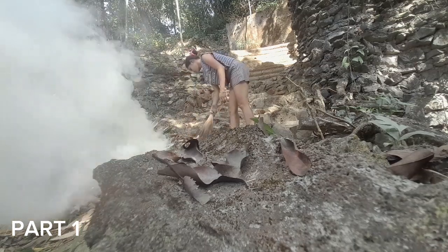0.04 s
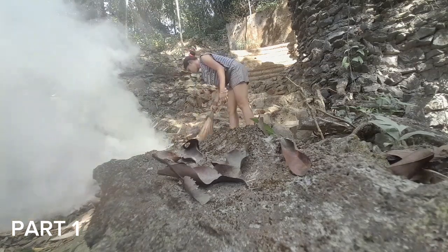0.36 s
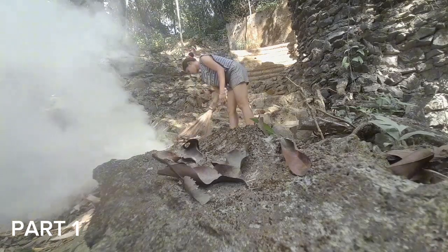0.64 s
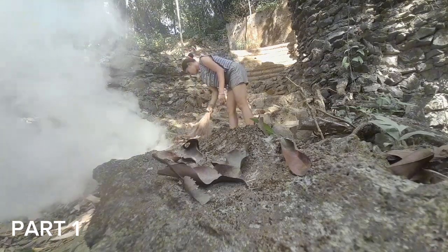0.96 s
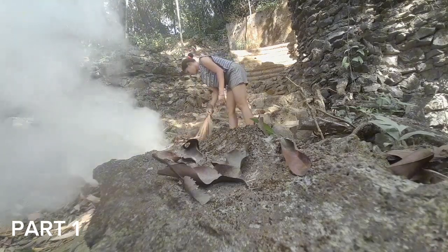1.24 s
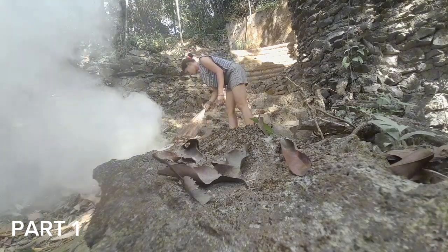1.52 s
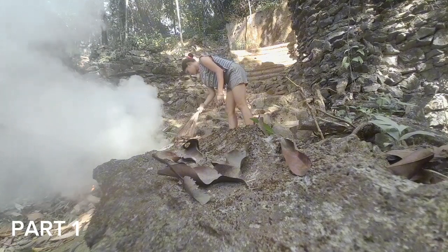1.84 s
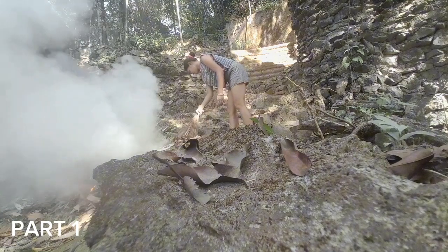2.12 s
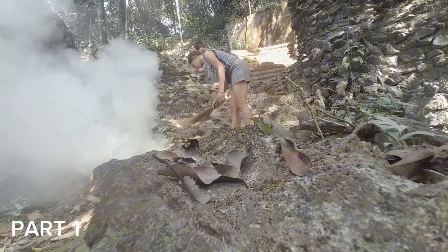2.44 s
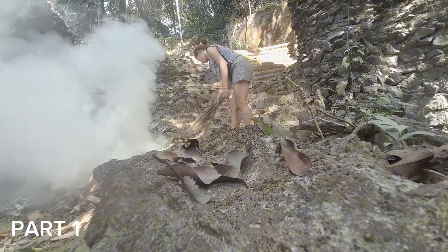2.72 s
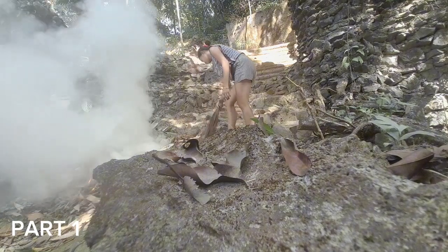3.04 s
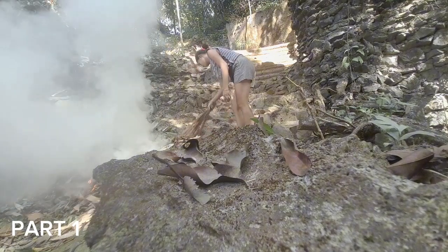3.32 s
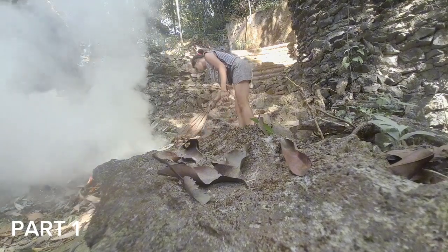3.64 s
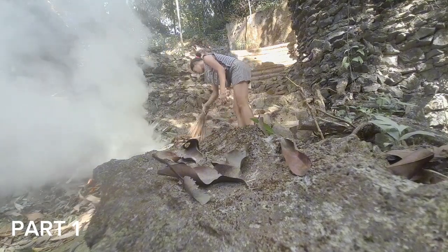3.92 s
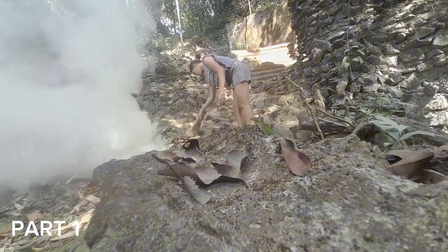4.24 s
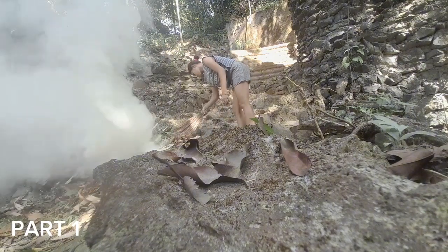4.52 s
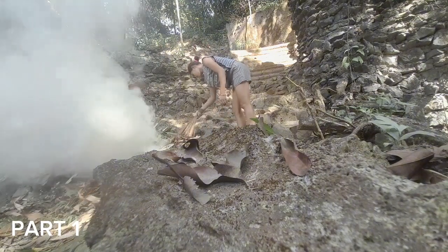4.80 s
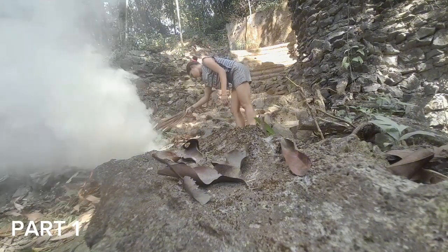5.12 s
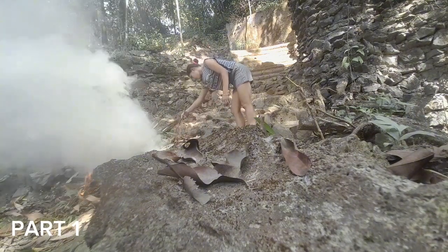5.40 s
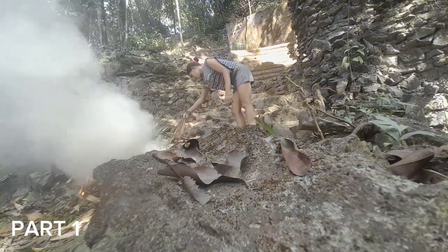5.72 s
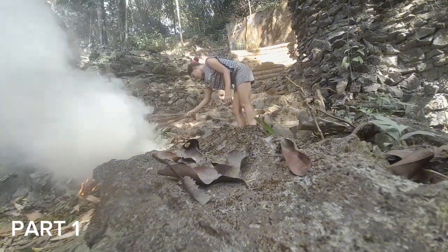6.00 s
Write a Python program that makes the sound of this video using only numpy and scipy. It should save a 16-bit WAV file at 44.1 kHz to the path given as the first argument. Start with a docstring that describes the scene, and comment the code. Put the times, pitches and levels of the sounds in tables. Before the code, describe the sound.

A stick broom sweeps dry leaves in scratchy strokes outdoors, while a small fire snaps now and then on the left.

```python
"""From the start, a stick broom sweeps dry leaves over rock a few metres away, about two strokes a second,
above a low forest rumble. Leaves crackle, and the broom's twigs rasp and knock on the ground.
After two seconds a small leaf fire on the left begins to snap now and then as fibres burst.
A distant bird gives one thin call just afterwards. The loudest snap comes a little past four seconds,
and the sweeping goes on to the end."""
import sys
import numpy as np
from scipy import signal
from scipy.fft import rfft, irfft
from scipy.io import wavfile
from scipy.ndimage import map_coordinates

SR = 44100
rng = np.random.default_rng(int(sys.argv[2]) if len(sys.argv) > 2 else 0)


def unload_audio(sound):
    """Save the sound as a 16-bit wav file, at the path given as the first command line argument."""
    columns = np.transpose(np.atleast_2d(sound))
    # keep every value between -1 and 1, then stretch to whole-number steps
    steps = np.round(np.clip(columns, -1, 1) * 32767)
    wavfile.write(sys.argv[1], SR, steps.astype(np.int16))


N = 276066

# the tone of the rustle as heard, including the microphone's resonance near 9.7 kHz: f/Hz, level/dB
RUSTLE_SPECTRUM = [(600, 12.5), (1200, -7), (1700, -4.5), (2100, -5.5), (2600, -2), (3100, -3),
                   (3800, -4.5), (4700, -7.5), (5700, -5.5), (7200, -6.5), (8700, -4), (9650, 4),
                   (11000, 1), (15800, -6.5)]


def broom():
    """A faster stroke stirs more leaves and louder ones; pressing down adds rasp and scrape."""
    # how far the sweeping leans left at each pitch: f/Hz, left minus right/dB
    lean = [(300, -1), (700, -5.5), (1200, 1.5), (1700, -4.5), (2200, 4), (3400, -5), (5000, -2),
            (7000, -1), (8600, -3.5), (9700, -1), (11500, 5.5), (16000, 2)]
    level_db, rasp_db, bite_db, scrape_db, swing_db = strokes()
    per_s = 9000 * from_db(.7 * (level_db + 38))  # tiny contacts each second
    rustle = leaf_rustle(per_s, swing_db) + twig_rasp(.6 * per_s, rasp_db)
    rustle += bristle_ring(per_s, level_db, bite_db, swing_db)
    scrape = ground_scrape(.14 * per_s, scrape_db)
    rustle += from_db(-14.5) * leaf_crackles(.05 * per_s)
    sweep = rock_echo(rustle, echo_db=-9, lag_s=.000706) + scrape
    sides = np.array([[.5], [-.5]])
    return colour(sweep * from_db(level_db + sides * swing_db), lean, share=sides)


def strokes():
    """Each push swells and lifts off. Gives level, rasp, bite, scrape and swing, led by the loudest push."""
    # pushes, often a light touch and then a shove: start/s, rise/s, length/s, rustle level/dB,
    # twig rasp/dB, bristle bite/dB, ground scrape/dB (these three relative to the rustle), swing left/dB
    pushes = [(-.019, 0.018, 0.24, -33.5, -7.5, -17, -14.5, 0),
              (0.338, 0.071, 0.16, -38.5, -5, -10.5, -12.5, 1),
              (0.512, 0.048, 0.13, -33, -7.5, -16, -14, 0.5),
              (0.778, 0.062, 0.16, -39.5, -8, -11.5, -16, 0),
              (0.895, 0.065, 0.17, -36.5, -9, -18, -14.5, 0.5),
              (1.188, 0.049, 0.24, -40.5, -8.5, -8, -17, 0.5),
              (1.303, 0.017, 0.17, -35, -10, -13.5, -18.5, 0), (1.553, 0.099, 0.21, -40, -7, -15, -16, 1),
              (1.742, 0.049, 0.14, -38.5, -9, -22, -16, 1.14),
              (2.022, 0.021, 0.093, -43, -7, -23, -18, 1.1), (2.088, 0.047, 0.18, -39.5, -10, -24, -17, .5),
              (2.487, .11, 0.17, -34, -10.5, -12.5, -18.5, 1), (2.759, .038, 0.062, -51, 0.5, -13, -8, 2.5),
              (2.86, 0.16, 0.24, -37, -9.5, -8.5, -22.5, 1), (3.162, 0.021, 0.19, -49, -3, -15, -11, 0.8),
              (3.34, .077, 0.099, -44, -8, -13, -20, -0.5), (3.41, 0.099, 0.14, -34, -12, -15, -20, -0.1),
              (3.791, .012, 0.11, -38.5, -11, -18, -44, -0.3),
              (3.897, 0.043, 0.089, -35, -12.5, -16, -22, 0),
              (3.988, .04, 0.11, -40, -15.5, -24, -18, -0.6),
              (4.192, 0.072, 0.17, -41.5, -12, -17, -20, .1),
              (4.371, 0.036, 0.11, -38, -12.5, -23, -22.5, 0), (4.517, 0.03, 0.12, -52, -5, -19, -5, 2),
              (4.823, 0.063, 0.075, -41, -10, -23, -24, 0.7),
              (4.913, 0.048, 0.19, -37, -13.5, -22, -24.5, 1.5),
              (5.224, 0.089, 0.18, -41.5, -11, -26, -22.5, 1.76),
              (5.416, 0.048, 0.15, -37, -16, -25, -28, 1.5),
              (5.689, 0.04, 0.15, -45.5, -15.5, -18, -34, 1.9),
              (5.852, 0.042, .16, -39, -18.5, -37, -27, 0.4), (6.15, 0.021, 0.16, -52, -7, -15, -7, 1)]
    # leaves stirring between pushes: rustle level/dB, rasp/dB, bite/dB, scrape/dB, swing left/dB
    stirring = (-58.5, -10.5, 0, -9, 1.7)
    arch_db, settle_db = 1.5, -20.5
    lift_db_per_s, settle_db_per_s = 110.5, 95
    t = np.arange(N) / SR
    power = np.full(N, from_db(stirring[0]) ** 2)
    blend = np.outer(stirring[1:], power)
    for start, rise, length, db, *manner in pushes:
        age, lifted = t - start, np.maximum(t - start - length, 0)
        speed = np.sin(np.pi * np.clip(age / (length + rise / 2), 0, 1))  # fastest halfway through
        push = np.clip(age / rise, 0, 1) * from_db(db + .61 - arch_db * (1 - speed))
        lift_off = from_db(-lift_db_per_s * lifted)
        settling = from_db(settle_db - settle_db_per_s * lifted)  # tossed leaves fall back
        push_power = push ** 2 * (lift_off ** 2 + settling ** 2)
        power += push_power
        blend += np.outer(manner, push_power)
    return 10 * np.log10(power), *(blend / power)


def leaf_rustle(per_s, swing_db):
    """Brushed leaves hiss, brighter when the broom swings left and faces the microphone."""
    leaves = grains(per_s, spread_db=3, clump_db=1.6, clump_rate=220, wash_db=16, linger_s=.0059)
    leaves = unit_power(cut(colour(leaves, RUSTLE_SPECTRUM), 3560, "high", order=4))
    treble = colour(leaves, [(10000, -50), (12500, 1)])
    treble_gain = from_db(1 + 1.9 * swing_db + drift(25))
    return (leaves + treble * (treble_gain - 1)) * from_db(-.6 * swing_db - .87)


def twig_rasp(per_s, rasp_db):
    """The broom's twigs catch and slip, lower and rougher than the leaves."""
    twigs = grains(per_s, spread_db=4, clump_db=1.45, clump_rate=130, wash_db=9.5, linger_s=.0058)
    twigs = cut(colour(twigs, RUSTLE_SPECTRUM), 4340, "low", order=4)
    return unit_power(cut(twigs, 1360, "high")) * from_db(rasp_db - .13)


def bristle_ring(per_s, level_db, bite_db, swing_db):
    """Bristles ring low as they bite, most in a fast stroke, and higher when only their tips graze."""
    bristles = grains(per_s, spread_db=2.8, clump_db=1.6, clump_rate=110, wash_db=8, linger_s=.003)
    bristles = cut(bristles, 2500, "high")
    bite = unit_power(resonate(bristles, 3260, width_hz=980))
    bite *= from_db(bite_db + .12 * (level_db + 41) + 1.1 * drift(22.03))
    graze = unit_power(resonate(bristles, 5110, width_hz=1550))
    graze *= from_db(-15 + 4.1 * swing_db + 1.2 * drift(22))
    return bite - graze


def ground_scrape(per_s, scrape_db):
    """The broom drags over the ground with a low, grainy sound."""
    contacts = grains(per_s, spread_db=3, clump_db=.5, clump_rate=70, wash_db=-9.5, linger_s=.0048)
    # the tone of the scraped ground: f/Hz, level/dB
    ground_spectrum = [(30, -42), (120, -9.5), (250, -1.5), (400, -5), (560, 2.5), (720, -4), (900, -10.5),
                       (1200, -22.5), (1700, -18.5)]
    return unit_power(colour(contacts, ground_spectrum)) * from_db(scrape_db + 2.3)


def leaf_crackles(per_s):
    """Single leaves buckle, each ringing briefly at a pitch of its own."""
    sizes = from_db(3.7 * np.minimum(rng.exponential(1, N), 3))
    clicks = sizes * (rng.random(N) < per_s / SR)
    pitches = np.geomspace(1800, 15000, 18)
    leaf = rng.integers(0, len(pitches), N)
    rings = sum((-1) ** k * resonate(clicks * (leaf == k), hz, width_hz=hz / 9)
                for k, hz in enumerate(pitches))
    return unit_power(colour(from_left(rings), RUSTLE_SPECTRUM))


def rock_echo(x, echo_db, lag_s):
    """The echo off the rock comes sooner or later as the broom moves, so the tone keeps shifting."""
    i = np.arange(N)
    echo = np.array([np.interp(i - lag_s * SR * np.exp(.25 * drift(7)), i, side) for side in x])
    return (x + from_db(echo_db) * echo) / np.sqrt(1 + from_db(echo_db) ** 2)


def knocks():
    """A soft bump of the broom makes the ground ring briefly while the twigs crack."""
    # bumps on rock and leaves: t/s, level/dB, f/Hz, time to fade by 60 dB/s, crack relative to bump/dB
    bumps = [(0.125, -31, 700, 0.026, 3), (0.208, -38, 600, 0.009, -4), (0.226, -28, 470, 0.012, -0.5),
             (0.245, -35, 215, 0.058, -13), (0.603, -34.5, 610, 0.0089, 8.5), (.994, -37, 603, 0.018, 5),
             (1.727, -22, 303, 0.019, -10.5), (2.563, -27, 405, 0.0029, -7), (3.189, -46, 600, 0.011, 11),
             (3.214, -43.5, 587, 0.013, 8), (3.289, -43, 608, .015, -6), (3.327, -45.5, 650, 0.011, 9),
             (3.843, -30, 396, 0.0029, -4), (4.069, -41.5, 650, 0.011, 6.5), (4.567, -40.5, 404, 0.015, 5),
             (5.632, -40.5, 640, 0.011, 0), (5.855, -38.5, 990, 0.0058, 4.5),
             (6.1662, -24.5, 520, 0.007, -2), (6.227, -39, 750, 0.0055, 1)]
    out, t = np.zeros((2, N)), np.arange(4096) / SR
    for s, db, hz, fade_s, crack_db in bumps:
        bump = np.sin(2 * np.pi * hz * t) * from_db(-60 * t / fade_s) * (1 - np.exp(-t / .0004))
        crack = cut(rng.standard_normal(len(t)), 4340, "low") * from_db(-60 * t / .044)
        knock = bump / np.abs(bump).max() + from_db(crack_db) * crack / np.abs(crack).max()
        add(out, s, from_db(db) * from_left(knock) * from_db([[-1.5], [1.5]]))
    return out + from_db(-10) * forest_echoes(out, fade_s=.17)


def snaps():
    """A fibre bursts: a sharp, bright crack, then a few milliseconds of splintering."""
    # the fire and dry twigs snapping: t/s, level/dB, f/Hz, left minus right/dB, noise relative to ring/dB
    bursts = [(2.0043, -29.5, 11900, 7, -2), (2.04, -26, 12400, 5, -3), (2.164, -23, 12500, 7, -20),
              (2.343, -35, 11000, 6, -13), (2.4392, -34, 13500, 15, -20), (2.498, -32, 9850, 5, -16),
              (2.8866, -18.5, 12900, 8, -3.5), (3.3054, -22, 14000, 15, -16), (4.166, -23.5, 11200, 10, -4),
              (4.2799, -7, 11200, 10, -9.5), (4.292, -16, 12200, 10, -32), (5.634, -20, 10100, 17.5, 1),
              (6.167, -28, 11000, 23, -3), (6.227, -32, 9960, -2, -12)]
    out, t = np.zeros((2, N)), np.arange(2048) / SR
    for s, db, hz, left_db, noise_db in bursts:
        fade = from_db(-60 * t / .002) + from_db(-16 - 60 * t / .016)
        burst = rng.standard_normal(len(t)) * fade
        ring = cut(resonate(burst, hz, width_hz=4000), 6000, "high")
        crack = ring + from_db(noise_db) * cut(burst, 2200, "high", order=1)
        crack *= from_db(db) / np.abs(crack).max()
        add(out, s, from_left(crack) * from_db([[left_db / 2], [-left_db / 2]]))
    return out + from_db(-10) * forest_echoes(out, fade_s=.044)


def bird():
    """A thin, wavering whistle, blurred by the forest."""
    # the course of the distant call: t/s, f/Hz, level/dB
    call = [(2.32, 3080, -80), (2.36, 3120, -59), (2.41, 3050, -56), (2.46, 3130, -57), (2.485, 3000, -60),
            (2.51, 2950, -80)]
    hz, db = in_time(call)
    waver_hz = 130 * drift(300)
    whistle = np.sin(2 * np.pi * np.cumsum(hz + waver_hz) / SR) * from_db(db) * (db > db.min())
    return forest_echoes(whistle, fade_s=.05)


def rumble():
    """A low outdoor rumble, nearly the same on both sides, slowly swells and sinks."""
    # the tone of the background: f/Hz, level/dB
    rumble_spectrum = [(20, -25), (40, -21), (54, 3), (68, -6.5), (95, -6), (118, 5), (145, -5),
                       (260, -6.5), (400, -16.5), (600, -23), (1000, -39), (3000, -45), (16000, -60.5)]
    # its slow rise and fall: t/s, level/dB
    swell = [(0, -1), (1.7, 0), (2.7, -3.5), (3.7, 0), (4.6, -1), (5.2, 0.5), (6.26, -1)]
    swell_db, = in_time(swell)
    shared = rng.standard_normal(N) * from_db(swell_db)
    separate = rng.standard_normal((2, N))
    air = from_left(shared, lag_s=.00008) + from_db(-9) * separate + from_db(9) * cut(separate, 726, "high")
    return unit_power(colour(air, rumble_spectrum)) * from_db([[-52.3], [-49.1]])


def forest_echoes(x, fade_s):
    """Many small echoes off rocks and trunks, different on each side."""
    t = np.arange(SR // 2) / SR
    echoes = rng.standard_normal((2, len(t))) * from_db(-60 * t / fade_s) * (1 - np.exp(-t / .0011))
    echoes /= np.sqrt(np.sum(echoes ** 2, axis=1, keepdims=True))
    return signal.fftconvolve(np.atleast_2d(x), echoes, axes=1)[:, :N]


def grains(per_s, spread_db, clump_db, clump_rate, wash_db, linger_s):
    """Tiny uneven clicks, in clumps as twigs catch and slip; each leaves a brief wash of echoes."""
    sizes = from_db(spread_db * np.minimum(rng.exponential(1, N), 4)) * rng.choice([-1, 1], N)
    clicks = sizes * (rng.random(N) < per_s / SR) / np.sqrt(per_s)
    clicks = unit_power(clicks * from_db(clump_db * drift(clump_rate)))
    # every contact is at a new spot, so its echoes are new and differ between left and right
    energy = signal.lfilter([1], [1, -np.exp(-1 / (linger_s * SR))], clicks ** 2 + 1e-12)
    wash = unit_power(np.sqrt(energy) * rng.standard_normal((2, N)))
    return unit_power(from_left(clicks) + from_db(wash_db) * wash)


def from_left(x, lag_s=.0002):
    """A sound from the left reaches the right side a little later."""
    i = np.arange(len(x))
    return np.array([x, np.interp(i - round(lag_s * SR), i, x, left=0)])


def from_db(db):
    """Turn decibels into a number to multiply by."""
    return 10 ** (np.asarray(db) / 20)


def unit_power(x):
    """Scale a sound to an average power of 1."""
    return x / np.sqrt(np.mean(x ** 2) + 1e-20)


def in_time(rows):
    """Join a table's timed points with straight lines, one curve per column."""
    s, *columns = np.transpose(rows)
    return [np.interp(np.arange(N) / SR, s, c) for c in columns]


def colour(x, points, share=1):
    """Turn pitches up or down along (f/Hz, level/dB) points; `share` scales the decibels."""
    hz, db = np.transpose(points)
    curve = np.interp(np.log(np.fft.rfftfreq(x.shape[-1], 1 / SR) + 1), np.log(hz), db)
    return irfft(rfft(x) * from_db(share * curve), x.shape[-1])


def cut(x, hz, keep, order=2):
    """Keep the "low" or the "high" side of a frequency."""
    return signal.sosfilt(signal.butter(order, hz, keep, fs=SR, output="sos"), x)


def resonate(x, hz, width_hz):
    """Ring at one pitch; a smaller width rings longer."""
    r = np.exp(-np.pi * width_hz / SR)
    feedback = [1, -2 * r * np.cos(2 * np.pi * hz / SR), r * r]
    return signal.lfilter(np.array([1, 0, -1]) * (1 - r * r) / 2, feedback, x)


def drift(rate):
    """A smooth random wobble of size about 1, changing `rate` times a second."""
    points = rng.standard_normal(8192)
    return unit_power(map_coordinates(points, [np.arange(N) / SR * rate], order=2, mode="wrap"))


def add(out, s, sound):
    """Mix a stereo sound in at s seconds."""
    i = round(s * SR)
    out[:, i:i + sound.shape[1]] += sound[:, :max(N - i, 0)]


def scene():
    """Broom, fire and forest together."""
    return broom() + knocks() + snaps() + bird() + rumble()


def record(dry):
    """Soften the deepest bass and cut the highest treble steeply."""
    treble_cut = signal.ellip(12, .1, 80, 16000, fs=SR, output="sos")
    return signal.sosfilt(treble_cut, cut(dry, 28, "high"))


dry = scene()
out = record(dry)
unload_audio(out)
```